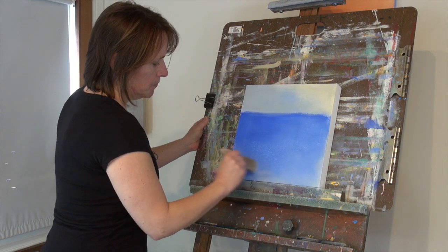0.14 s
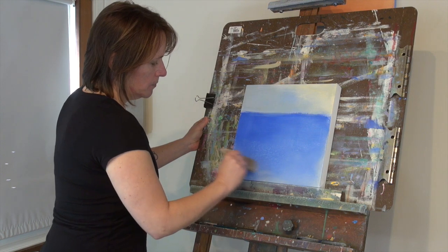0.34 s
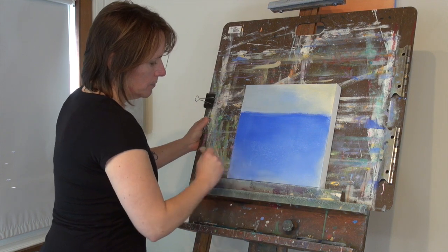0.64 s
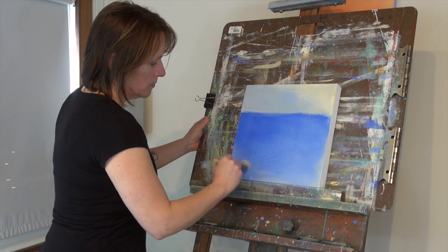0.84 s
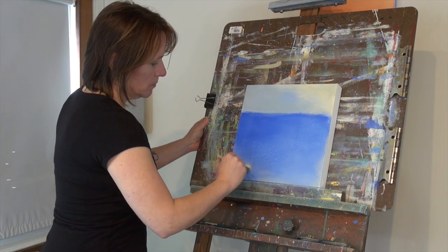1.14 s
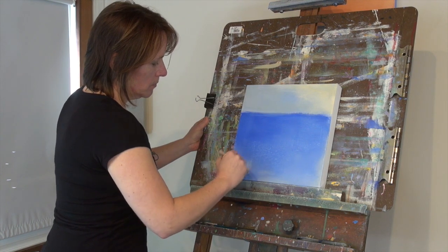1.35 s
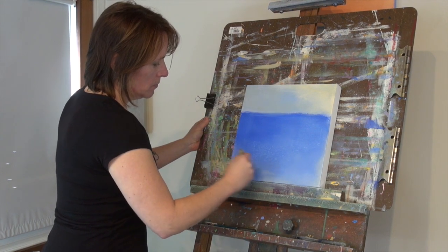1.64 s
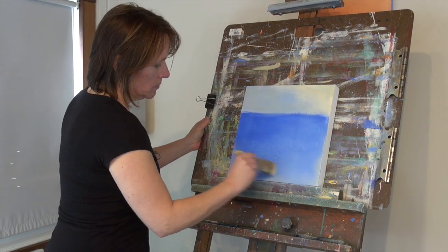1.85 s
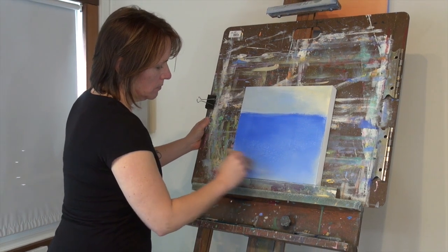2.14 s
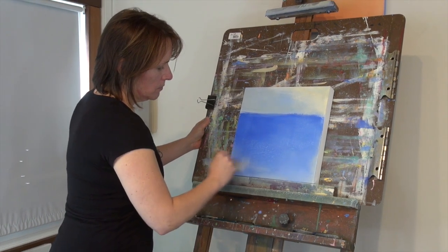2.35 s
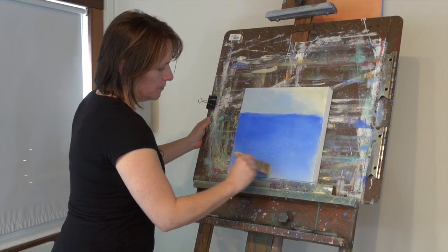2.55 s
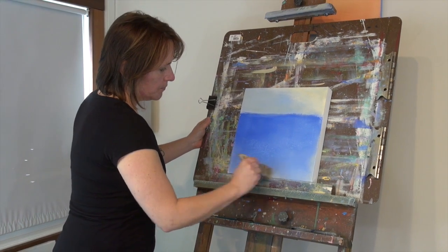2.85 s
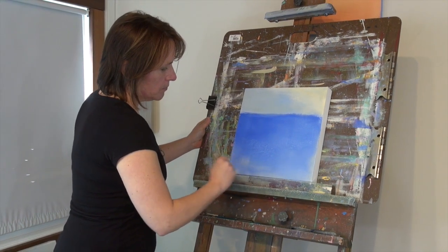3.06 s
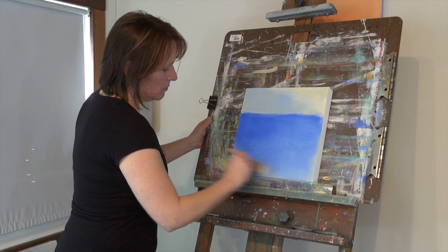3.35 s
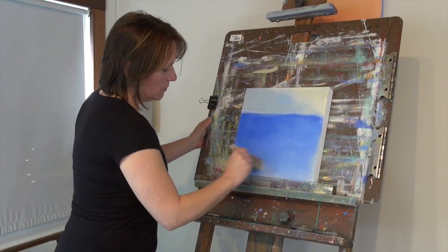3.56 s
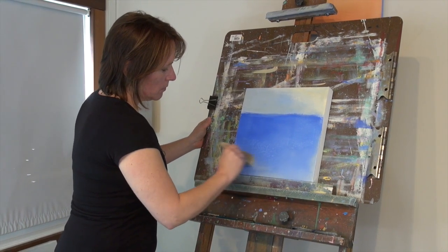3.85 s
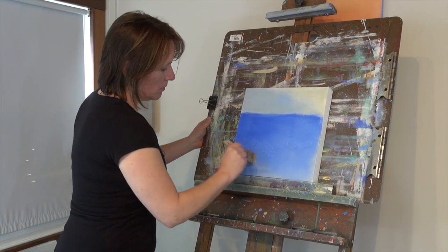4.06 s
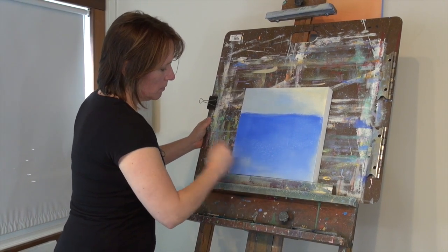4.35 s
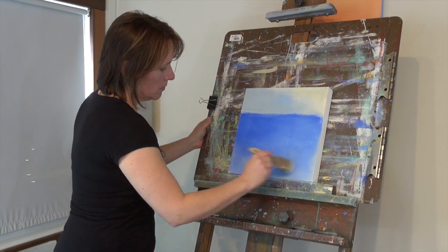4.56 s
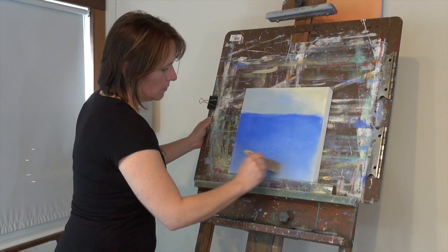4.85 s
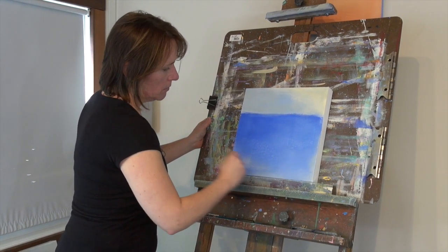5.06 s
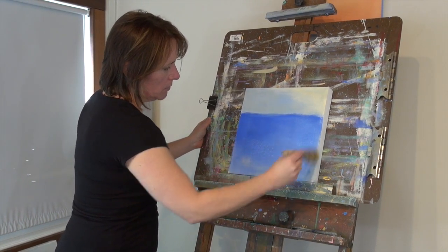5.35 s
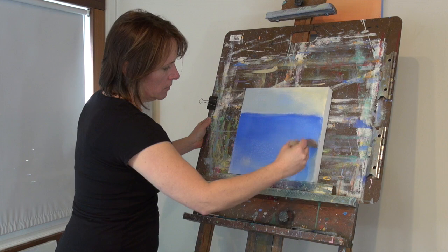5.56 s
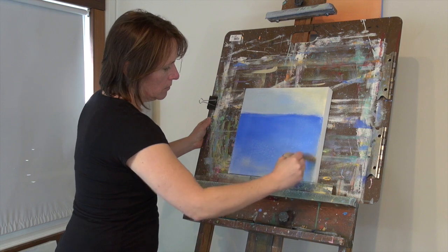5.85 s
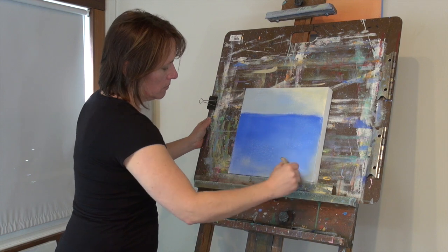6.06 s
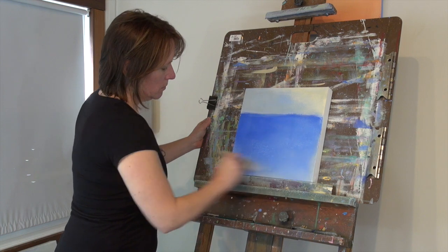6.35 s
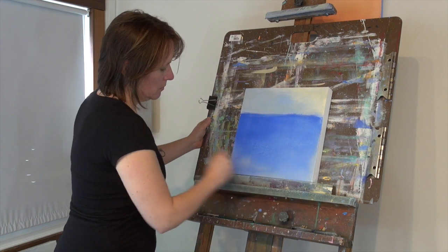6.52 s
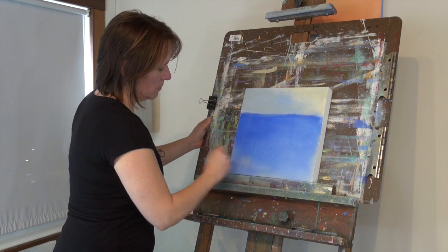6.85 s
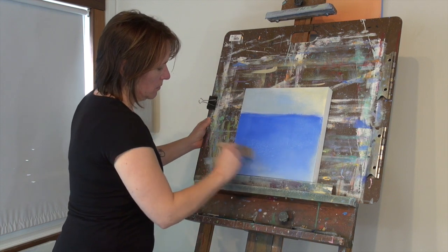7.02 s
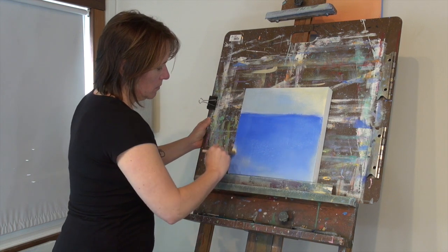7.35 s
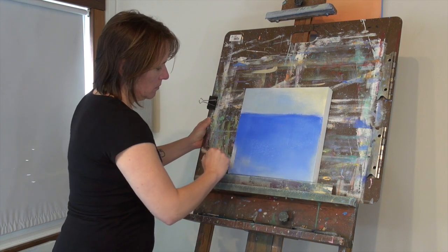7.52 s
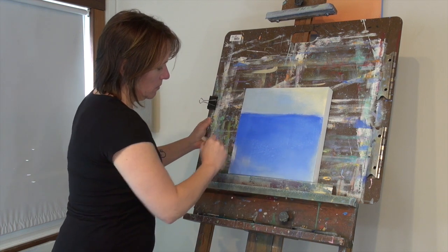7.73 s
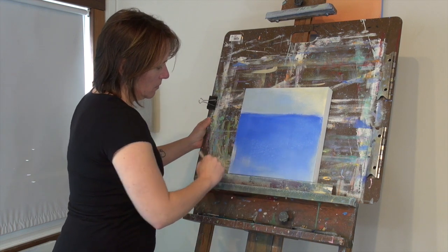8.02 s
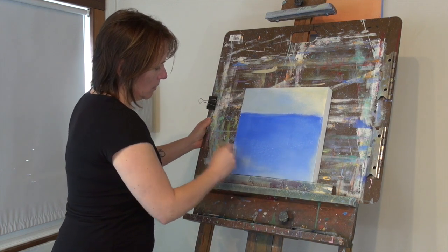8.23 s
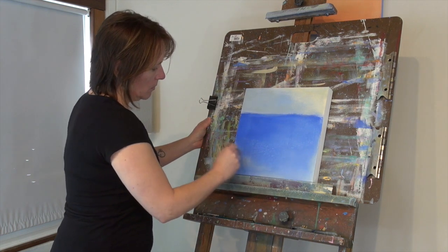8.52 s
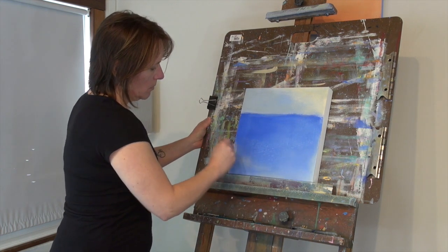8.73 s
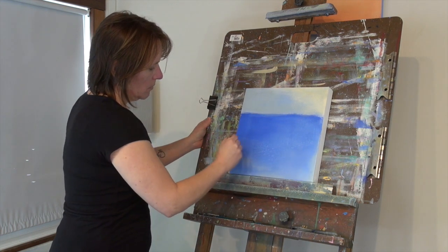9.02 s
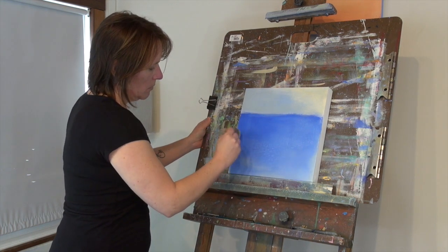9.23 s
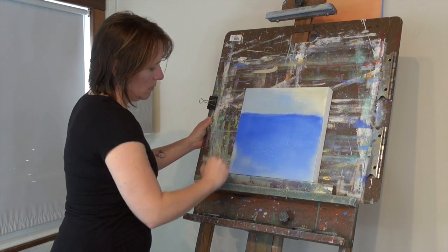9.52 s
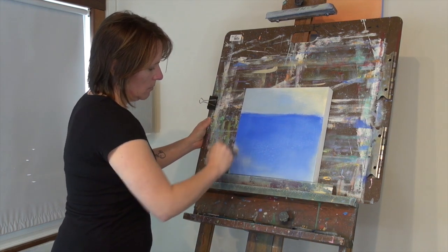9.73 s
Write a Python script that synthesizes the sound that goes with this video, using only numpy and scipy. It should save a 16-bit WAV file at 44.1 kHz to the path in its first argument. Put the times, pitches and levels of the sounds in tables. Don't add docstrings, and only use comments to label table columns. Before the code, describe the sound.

Dry bristles scratch over woven cloth in short swishes, each a tenth to a quarter second, grainy and papery with a hollow drum-like body. Some brush landings tap the canvas and easel; one light metallic tick comes early. Strokes bunch up, pause, then bunch again in a small quiet room, heard in mono at moderate distance with low camera hiss and a barely audible whine.

```python
import sys
import numpy as np
from scipy import signal
from scipy.fft import rfft, irfft, next_fast_len
from scipy.io import wavfile
from scipy.ndimage import uniform_filter1d

SR = 44100
rng = np.random.default_rng(int(sys.argv[2]) if len(sys.argv) > 2 else 0)


def to_wav(sig):
    pcm = np.clip(np.atleast_2d(sig), -1, 1) * 32767
    pcm = np.round(pcm).astype(np.int16)
    wavfile.write(sys.argv[1], SR, pcm.T)


def ratio(d):
    e = np.asarray(d, float) / 20
    return 10 ** e


N = 435755


def brush():
    scratch, belly_gain, frame_gain, tips_gain, belly_hz, weave_hz = controls()
    clicks = slips(share=.15, scatter_db=2.15, patchy_db=2.3, patch_rate=98)
    push = scratch * level(clicks, 0)
    cloth = cloth_belly(push * belly_gain, belly_hz)
    bars = wooden_frame(push * frame_gain)
    rasp = level(weave_rasp(weave_hz), 0.96)
    fizz = level(tip_fizz(), 0.74)
    return ratio(27.5) * cloth + ratio(28) * bars + scratch * (rasp + tips_gain * fizz)


def controls():
    # start_s, place_cm (from the middle of the cloth), upright_db (brush on its tips),
    # bar_db (cloth pressed on a bar), belly_hz (pitch of the cloth)
    arm = [(.4, 1.5, -4.5, -5.5, 560), (.62, 8.5, 2, -5, 560), (.93, 2, -8.5, -2.5, 472),
           (1.16, -7, -5, -0.5, 510), (1.4, 1.7, -6, -3, 473), (1.75, -6, -2.5, -2, 560),
           (2.398, 6, -2.5, -4.5, 603), (3.8, .1, -3, -6, 588), (4.5, 10.5, 0, -8.5, 590),
           (5.2, 3.5, -4.5, -6.5, 598), (5.8, 24, -6.5, -4, 610), (6.4, 9, -0.5, -6, 607),
           (7.4, 3.5, -1, 3, 583), (8.02, 16, 5.5, -8, 555), (8.6, 2.5, -1.5, 0.9, 550),
           (9.15, 4, 4, 0.1, 507), (9.53, 11, 1.5, -7, 520), (9.8, 5, 2.6, -1.5, 553)]
    # start_s, weave_hz
    edge = [
        (4.2, 3020),
        (4.26, 1640),
        (4.4, 3080),
        (5.4, 2830),
        (5.75, 2150),
        (6.08, 2050),
        (6.4, 3020),
    ]
    t = np.arange(N) / SR
    coarse = np.arange(0, N, 32) / SR
    press, travel_cm = (np.interp(t, coarse, c) for c in passes(coarse))
    start_s, *columns = np.transpose(arm)
    place_cm, upright_db, bar_db, belly_hz = (np.interp(t, start_s, c) for c in columns)
    belly_db = -1.0842 * (place_cm + travel_cm)
    frame_db = bar_db - 0.14 * travel_cm
    tips_db = upright_db + .5 * travel_cm
    slow_db = np.minimum(20 * np.log10(press) + 46, 0)
    belly_gain = ratio(belly_db - 0.061 * slow_db)
    frame_gain = ratio(frame_db - 0.028 * slow_db)
    tips_gain = ratio(tips_db + 0.064 * slow_db)
    belly_hz = belly_hz * np.exp(0.0051 * travel_cm)
    weave_hz = np.interp(t, *np.transpose(edge)) * np.exp(-0.012 * travel_cm)
    return press, belly_gain, frame_gain, tips_gain, belly_hz, weave_hz


def passes(t):
    brisk = [(.001, 0.13, -53, 3, 14), (.148, 0.099, -50, -14, -4), (.256, 0.12, -52.5, -8, -6),
             (.385, 0.14, -48, -10, -18), (2.128, .18, -46, 2, -15.5), (2.492, 0.14, -46.5, 0.5, -20),
             (2.805, 0.17, -47, -4.5, -4), (2.994, 0.15, -47, 14.5, 24), (3.168, .168, -48, 4, -1),
             (3.37, 0.16, -48, 7.5, 8.5), (3.54, 0.14, -47.5, -2.5, 6), (3.682, 0.13, -47.5, 3.5, 6),
             (3.82, 0.096, -47.5, -5, -14), (3.92, 0.12, -49, -3.5, 11), (4.054, 0.1, -46.5, -7, -9),
             (4.462, 0.13, -46, 5, 8), (4.66, 0.12, -46.5, 11, 17), (4.978, .1, -50, 8, 25),
             (5.13, 0.21, -46, 5, 11), (6.3, 0.2, -47, 8.5, 29), (6.794, 0.1, -47, 20, 17),
             (8.05, 0.085, -65.5, -5, 0.1), (8.574, 0.14, -53, -16.5, -7), (8.82, .118, -52, -5, -3)]
    swings = [
        (.525, 0.14, -47.5, 3.5, 15),
        (1.9, 0.21, -47.5, 12, 10),
        (2.3, 0.19, -47, -1, 21),
        (2.634, 0.16, -47, 6, 15),
        (9.045, 0.13, -52, -1.5, -6),
        (1.086, 0.17, -53.5, -8, 20),
        (1.306, 0.16, -50, -5.5, 27),
        (9.445, .17, -45.5, -8, 11),
        (9.765, 0.15, -48, 6, 2.3),
    ]
    dabs = [(.699, 0.019, -43.5, -5, 19), (.89, .13, -52.5, -15.5, 5), (1.084, 0.062, -60, 9, -7),
            (1.304, 0.067, -57, 14, -3), (1.617, 0.28, -50, -2, 3.5), (4.84, 0.13, -45.5, 1.5, -1),
            (5.644, 0.18, -53, 9.5, 12), (5.97, 0.13, -52.5, 4.5, 12), (6.609, 0.13, -48.5, -5.5, 5),
            (6.951, 0.13, -48, 1, 11), (7.272, 0.4, -53, 2.5, -7), (7.936, 0.056, -58.5, 5, 7),
            (8.297, 0.12, -50.5, -2.5, 12), (8.552, .03, -50, -2, 2), (8.794, 0.026, -52, 0.1, -6),
            (9.328, 0.081, -75, 0.1, -2), (9.438, 0.04, -60, 6, 2), (9.705, 0.04, -74, -10, 0.1),
            (9.758, .05, -59, 7, 2), (.11, 0.054, -66, .1, -5), (.345, 0.065, -65, 2, -5),
            (4.02, .06, -62, .1, -5), (1.46, .1, -78, -4, -5)]
    flicks = [
        (4.158, 0.12, -47.5, 11, 24),
        (7.57, 0.082, -49.5, 1, 4.5),
        (7.945, 0.081, -53, 0, 37),
    ]
    ends_db, touch_s = 19, .003
    gain, travel = np.full(len(t), 1e-9), np.zeros(len(t))
    kinds = ((brisk, 0.027, .04, 4.5), (swings, 0.1, 0.045, 1), (dabs, .0045, .04, 4), (flicks, 0.047, 0.017, 0.76))
    for rows, attack_s, release_s, sag_db in kinds:
        start_s, length_s, scratch_db, swell_db, travel_cm = np.transpose(rows)[:, :, None]
        along = np.clip((t - start_s) / length_s, 0, 1) - .5
        rise = np.maximum(1 - (t - start_s) / attack_s, 0) ** 2
        lift = np.maximum(1 - (start_s + length_s - t) / release_s, 0) ** 2
        ends = rise + lift + np.maximum(start_s - t, 0) / touch_s
        shape_db = swell_db * along - sag_db * (2 * along) ** 2 - ends_db * np.minimum(ends, 10)
        each = ratio(scratch_db + shape_db)
        gain = gain + each.sum(axis=0)
        travel = travel + (each * travel_cm * along).sum(axis=0)
    return gain, travel / gain


def slips(share, scatter_db, patchy_db, patch_rate):
    go = rng.random(N) < share
    size, sign = rng.exponential(size=N), rng.standard_normal(N)
    return go * sign * ratio(scatter_db * size + patchy_db * flicker(patch_rate))


def cloth_belly(push, belly_hz):
    # pitch_hz, width_hz, level_db
    swinging = [(413.3, 163, 8), (471.2, 114, 5.5), (528, 73, 2), (583.3, 64.5, 0.5), (655, 94, 1.5),
                (725, 79, 2)]
    cloth = body(push, swinging, belly_hz, reach=0.21, wander_db=3)
    return signal.sosfilt(signal.butter(4, 370, "high", fs=SR, output="sos"), cloth)


def wooden_frame(push):
    # pitch_hz, width_hz, level_db
    bars = [(878, 112, -1.5), (942.5, 116, 0.5), (1054, 102, -10), (1189, 65, -5), (1340, 120, -10.5),
            (1473, 51, 2)]
    return body(push, bars, 970.0, reach=0.47, wander_db=4)


def weave_rasp(weave_hz):
    # pitch_hz, width_hz, level_db
    threads = [(1610, 140, 1), (1967, 72, 8), (2315, 190, 2), (2765, 70, 0), (3370, 210, -6),
               (3630, 360, -2.5), (4720, 440, 15)]
    # pitch_hz, level_db (per Hz)
    scratch_colour = [(100, -30.5), (300, -7), (600, 1), (1100, -5.5), (1600, 0.5), (3600, -0.5),
                      (5200, -6), (7500, -11.5), (10000, -16)]
    rasp = level(slips(share=.4, scatter_db=1.5, patchy_db=3.0, patch_rate=60), 0)
    singing = body(rasp[::-1], threads, weave_hz, reach=.3, wander_db=6)
    return colour(rasp + ratio(5.5) * singing, scratch_colour)


def tip_fizz():
    # pitch_hz, level_db (per Hz)
    tip_colour = [(5000, 1), (7500, -5.5), (9500, 5.5), (11000, 6.5), (14000, 9), (15700, 3.5)]
    fizz = slips(share=.5, scatter_db=2.0, patchy_db=3.0, patch_rate=70)
    tufts = [(hz, 1500, 0) for hz in (7500, 9500, 11500, 13500, 15200)]
    mottled = body(fizz, tufts, 12000., reach=2.5, wander_db=15.5)
    return colour(1.1 * fizz + mottled, tip_colour)


def body(push, modes, centre_hz, reach, wander_db):
    near = []
    for hz, _, _ in modes:
        distance = np.log(hz / centre_hz) / reach
        near.append(np.exp(wander_db / 7.8 * flicker(22) - distance ** 2))
    near = np.array(near)
    near = near / np.sqrt((near ** 2).sum(axis=0))
    out = np.zeros(N)
    for k, (hz, width_hz, db) in enumerate(modes):
        out += (-1) ** k * ratio(db) * resonate(push * near[k], hz, width_hz)
    return out


def landings():
    # start_s, peak_db, thud_db (over
    # the knock), crack_db (over the knock)
    hits = [(0.159, -35.5, -18, -12), (0.274, -35, -26, -10), (0.403, -30.5, -20.5, -14),
            (0.549, -45, -35, -10), (0.894, -33, -13.5, -28), (0.903, -29.5, -21, -22),
            (1.043, -51, -16, -19), (1.088, -41, -13, -24), (1.308, -47, -17, -23), (1.331, -33, -19, -30),
            (1.62, -40.5, -24, -32), (2.506, -31.5, -29, -16), (3.841, -33, -23, -11),
            (4.07, -33, -17, -13), (4.272, -43.5, -12, 1), (4.847, -47, -13, -11), (5.65, -48, -35, -17),
            (5.983, -36, -25, -32), (6.615, -39.5, -32, -24), (6.96, -41.5, -39, -13), (7.275, -42, -12, 6),
            (7.634, -43.5, -12, 12.5), (7.94, -41.5, -26, -11), (8.058, -55.5, -26, 14.5),
            (8.303, -35, -12.5, -32), (8.554, -55, -20, -12), (8.8, -49.5, -9, 0), (9.048, -49, -5, 0),
            (9.439, -41.5, -35, -23), (9.763, -38, -19, -19),
            (3.556, -35.5, -33, -13),
        (7.9, -55, -35, -14),
        (4.472, -48.5, -30, -16),
    ]
    # start_s, peak_db
    springs = [
        (5.3961, -54),
        (6.2357, -62),
    ]
    # pitch_hz, level_db, fade_s (to fall 60 dB)
    knock = [(436, 4, 0.049), (560, 8.5, 0.046), (636, -4, 0.096), (907, 5, 0.037), (1017, -18, 0.078),
             (1200, -14, 0.06)]
    thud = [(89, -3, 0.2), (124.5, -1, 0.14), (168, -1.5, 0.11), (241, 11.5, 0.047), (355, 3, 0.07)]
    ferrule = [(1787, -11, .07), (3100, -3, .012), (5000, 0, .008)]
    out, t = np.zeros(N + 8000), np.arange(8000) / SR

    def add(start_s, peak_db, sound):
        out[int(start_s * SR):][:len(t)] += ratio(peak_db) * sound

    soft = 1 - np.exp(-t / 0.00058)
    for start_s, peak_db, thud_db, crack_db in hits:
        crack = resonate(rng.standard_normal(len(t)), 2700, 2600) * np.exp(-t / 0.0044)
        ringing = ring(knock, t, spread_db=3.0) + ratio(thud_db) * ring(thud, t, spread_db=2.0)
        add(start_s, peak_db + 3.5, soft * ringing + ratio(crack_db - 4.0) * crack)
    add(.705, -37, ring(ferrule, t, spread_db=0.5))
    for start_s, peak_db in springs:
        tick = np.diff(rng.standard_normal(len(t) + 1)) * np.exp(-t / 0.00092)
        add(start_s, peak_db + 2.0, tick)
    return signal.sosfilt(signal.butter(2, 85, "high", fs=SR, output="sos"), out[:N])


def ring(modes, t, spread_db):
    hz, db, fade_s = np.transpose(modes)[:, :, None]
    sign, force, detune = rng.standard_normal((3, len(modes), 1))
    fading = np.sign(sign) * ratio(db + spread_db * force - 60 * t / fade_s)
    y = fading * np.sin(2 * np.pi * hz * (1 + 0.0027 * spread_db * detune) * t)
    y = y.sum(axis=0)
    return y / np.abs(y).max()


def room(x):
    fade_s, room_db, treble_hz = 0.31, -13, 6040
    t = np.arange(int(.3 * SR)) / SR
    dense = rng.standard_normal((2, len(t))) * (t > .007)
    low = signal.lfilter(*signal.butter(1, treble_hz, fs=SR), dense)
    tails = low * ratio(-60 * t / fade_s) + (dense - low) * ratio(-120 * t / fade_s)
    tails = tails / np.linalg.norm(tails[0])
    share = np.array([flicker(8) for _ in tails])
    share = share / np.sqrt((share ** 2).sum(axis=0))
    return ratio(room_db) * signal.oaconvolve(x * share, tails, axes=1).sum(axis=0)[:N]


def camera_noise():
    # pitch_hz, level_db (per Hz)
    hiss_colour = [(18, -35), (30, -20), (124, 0), (194, -5), (259, 0), (2980, -15.5), (3310, -13.5),
                   (3580, -15.5), (5310, -17), (7270, -18.5), (8980, -18), (14800, -21.5), (16000, -31)]
    # pitch_hz, level_db (rms)
    whines = [(50.5, -94), (3198, -84), (13776, -90)]
    t = np.arange(N) / SR
    out = level(colour(rng.standard_normal(N), hiss_colour), -69) * ratio(.5 * flicker(5))
    for hz, db in whines:
        out += np.sqrt(2) * ratio(db + 1.6 * flicker(30)) * np.sin(2 * np.pi * hz * t)
    return out


def level(x, db):
    return x * ratio(db) / np.sqrt(np.mean(x ** 2))


def colour(x, points):
    hz, db = np.transpose(points)
    size = next_fast_len(N)
    bins = np.log(np.arange(size // 2 + 1) * SR / size + 1)
    gain = ratio(np.interp(bins, np.log(hz), db, left=-80))
    return irfft(rfft(x, size) * gain, size)[:N]


def resonate(x, hz, width_hz):
    return signal.lfilter(*signal.iirpeak(hz, hz / width_hz, SR), x)


def flicker(rate):
    k = int(SR / rate)
    steps = np.repeat(rng.standard_normal(N // k + 1), k)
    return uniform_filter1d(uniform_filter1d(steps, k), k)[:N]


def scene():
    near = brush() + landings()
    return np.tile(near + room(near) + camera_noise(), (2, 1))


def low_pass(x):
    return signal.sosfilt(signal.butter(12, 16530, fs=SR, output="sos"), x)


def record(dry):
    bass = signal.butter(2, 38, "high", fs=SR, output="sos")
    top = signal.ellip(12, .3, 65, 15740, fs=SR, output="sos")
    mix = signal.sosfilt(np.vstack([bass, top]), dry)
    return low_pass(mix)


dry = scene()
out = record(dry)
to_wav(out)
```